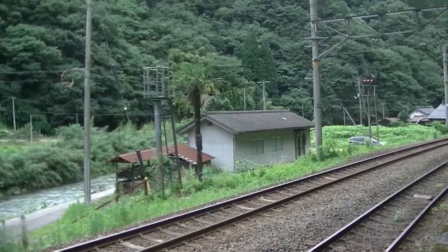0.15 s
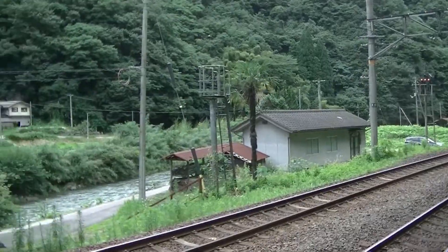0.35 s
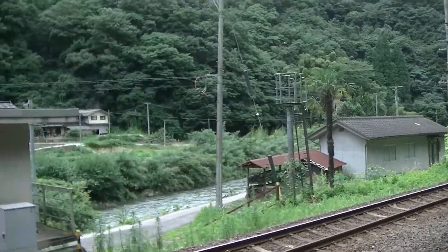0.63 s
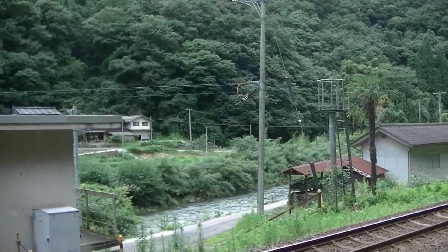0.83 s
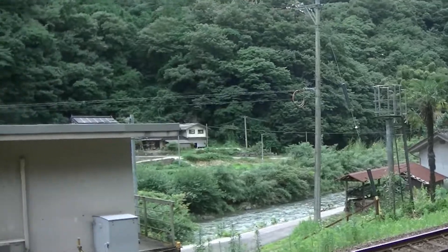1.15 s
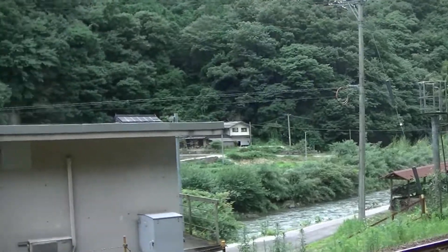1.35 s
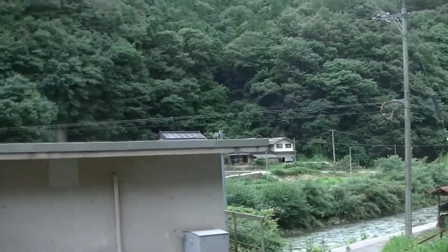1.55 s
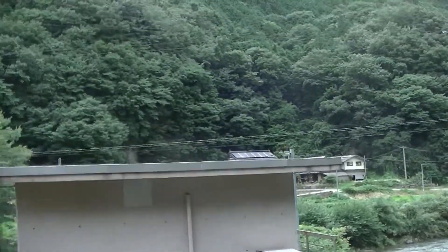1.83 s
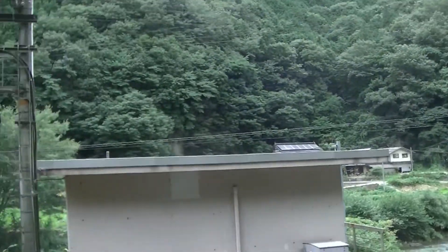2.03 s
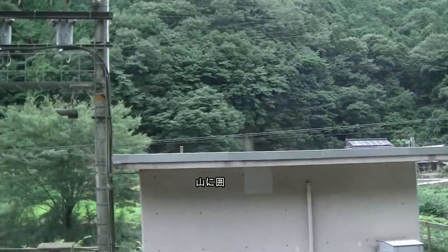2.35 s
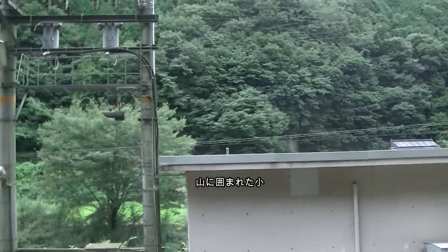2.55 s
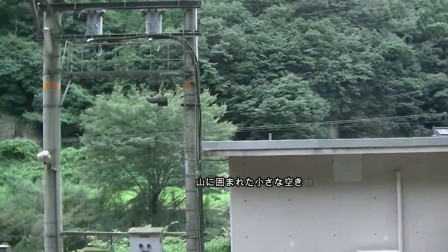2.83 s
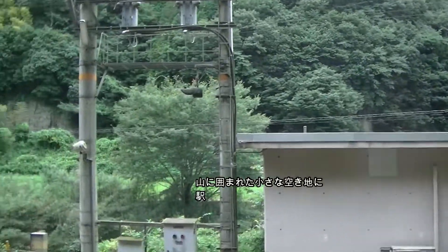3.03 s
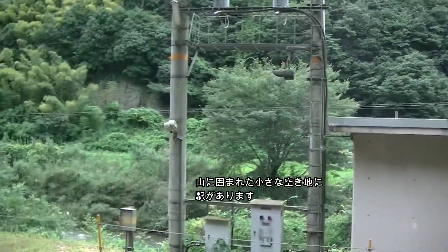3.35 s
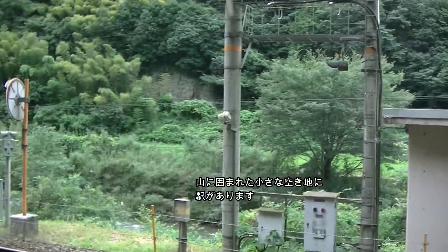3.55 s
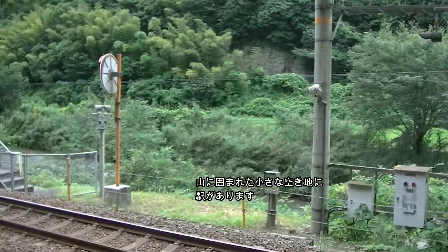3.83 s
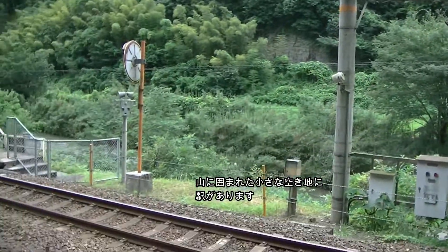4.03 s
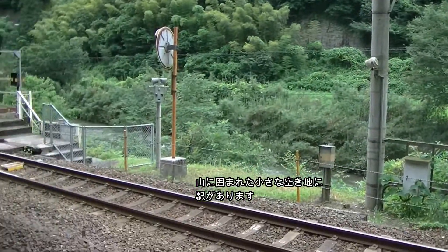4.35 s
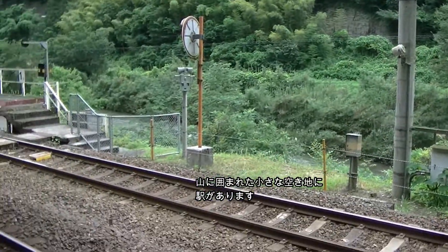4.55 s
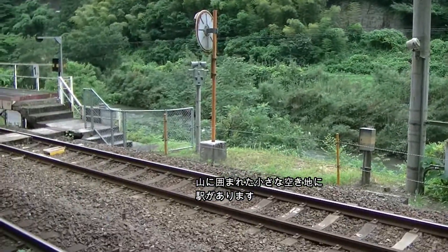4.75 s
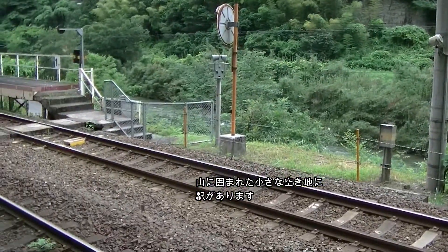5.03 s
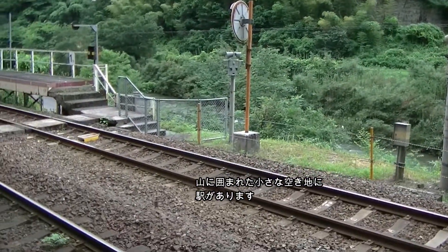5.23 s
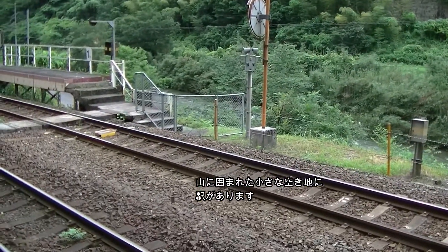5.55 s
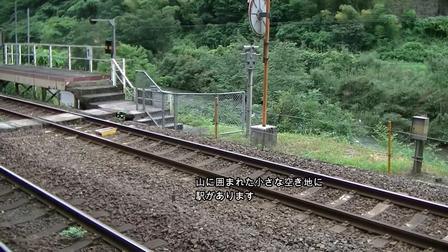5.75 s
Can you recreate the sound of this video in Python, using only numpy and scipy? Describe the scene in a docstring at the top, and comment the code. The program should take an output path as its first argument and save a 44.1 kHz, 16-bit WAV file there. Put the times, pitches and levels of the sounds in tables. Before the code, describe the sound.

From 0 to about 6 seconds, shallow river rapids rush continuously, a broad mid-heavy wash with gently fluctuating bands, little deep rumble and its body to the left; it fades by only about one decibel. A distant cicada crowd shimmers between roughly 2 and 7 kHz, rising over the first 3.4 seconds. Two small cicadas sizzle unbroken around 8 kHz, growing louder and more direct from 1.5 to 5.4 seconds. A near, bright cicada swells in raspy phrases about every 0.8 seconds, starting almost at once. A narrow buzz answers between them, strongest near 0.4 and 4.5 seconds, alongside a duller far singer whose last phrase is faint. From about 1.9 seconds a thin, nearly tonal whine comes and goes, its pitch creeping up around 3.4 seconds and strongest after 5.1. The stereo microphones turn slowly, shifting cicadas slightly left during the first 2.5 seconds; trees scatter everything diffusely.

```python
"""The rush of river rapids and a hillside of cicadas sound together throughout, at a slowly turning microphone pair.
The rapids are noise in four bands that surge independently, standing for countless bubbles.
Each cicada is a train of tymbal clicks and rasps ringing a resonant abdomen: two sizzle without pause,
four sing in overlapping phrases, and a distant crowd merges into a shimmer. The trees scatter all of them."""
import sys
import numpy as np
from scipy import signal
from scipy.fft import rfft, irfft
from scipy.io import wavfile
from scipy.ndimage import uniform_filter1d, map_coordinates

SR = 44100
rng = np.random.default_rng(int(sys.argv[2]) if len(sys.argv) > 2 else 0)


def digitize_waveform(pressure):
    """Quantize a signal to 16-bit integers and store it at the path in sys.argv[1].

    Rows of a 2-D input are taken as channels; values are limited to [-1, 1].
    """
    field = np.atleast_2d(pressure).T
    bounded = np.clip(field, -1, 1)
    quanta = np.round(bounded * 32767).astype(np.int16)
    wavfile.write(sys.argv[1], SR, quanta)


N = 259749
TIME = np.arange(N) / SR
FREQ = np.fft.rfftfreq(N, 1 / SR) + 1e-6  # the offset avoids dividing by zero


def undb(db):
    """Level to amplitude: 20 dB is a factor of ten."""
    return 10 ** (np.asarray(db) / 20)


def unit(x):
    """Normalisation by mean power: scale to rms 1."""
    return x / np.sqrt(np.mean(x ** 2))


def ease(start, length):
    """Raised-sine transition: a smooth move from 0 to 1, with times in seconds."""
    return np.sin(np.pi / 2 * np.clip((TIME - start) / length, 0, 1)) ** 2


def walk(rate):
    """Low-pass random fluctuation: levels held 1 / rate s, then averaged twice; spread near 1."""
    hold = max(int(SR / rate), 1)
    held = rng.standard_normal(4096)[np.arange(N) // hold % 4096]
    smoothed = uniform_filter1d(uniform_filter1d(held, hold), hold)
    return 1.3 * smoothed


def colour(x, points):
    """Spectral shaping: gain follows (frequency [Hz], level [dB]) points along log frequency."""
    hz, db = np.transpose(points)
    gain = undb(np.interp(np.log(FREQ), np.log(hz), db))
    return irfft(rfft(x) * gain, N)


def resonate(x, modes):
    """Modal resonance: powers of steep-sided (centre [Hz], width [Hz], level [dB]) modes add."""
    power = 0
    for hz, width, db in modes:
        detuning = (FREQ / hz - hz / FREQ) * hz / width
        power = power + undb(db) ** 2 / (1 + detuning ** 2) ** 2
    return unit(irfft(rfft(x) * np.sqrt(power), N))


COHERENCE_HZ = 5740  # likeness of the two microphones halves here and falls off above


def surround(pair, ceiling):
    """Diffuse-field coherence: two unrelated sounds become alike in the bass, unlike in the treble."""
    likeness = np.clip(ceiling, 0, 1) / (1 + (FREQ / COHERENCE_HZ) ** 4.0)
    mid, side = irfft(rfft(pair) * np.sqrt([1 + likeness, 1 - likeness]), N)
    return np.array([mid + side, mid - side])


def woods(x, t60, count=36):
    """Multiple scattering: trunks and leaves return a dense, decaying echo cloud that keeps changing."""
    hop = N // count + 1
    age = TIME[:SR // 3]
    fade = np.sin(np.pi * np.arange(2 * hop) / (2 * hop))
    decay = np.exp(-np.log(1000) * age / t60)  # falls at 60 dB per t60 seconds
    padded = np.pad(x, (hop, 2 * hop))
    pair = np.zeros((2, N + 3 * hop + len(age)))
    # overlapping stretches of song, each with freshly drawn echoes
    for start in range(0, N + hop, hop):
        echoes = rng.standard_normal((2, len(age))) * decay / np.linalg.norm(decay)
        stretch = fade * padded[start:start + 2 * hop]
        cloud = signal.fftconvolve(stretch[None], echoes, axes=1)
        pair[:, start:start + cloud.shape[1]] += cloud
    return surround(pair[:, hop:hop + N], ceiling=0.99)


# as the pair turns, the cicadas shift left: left lead [samples] and left minus right [dB], added to each
SHIFT_S, LEAD_BEFORE, LEAD_AFTER, PAN_BEFORE_DB, PAN_AFTER_DB = 2.5, -0.15, 0.78, -.3, .55


def place(x, direct, lead, pan_db, t60):
    """Direct and scattered power: one share arrives straight with a time difference, the rest via trees."""
    share = np.clip(direct, 0, 1)
    sides = np.array([[1], [-1]]) / 2  # left, right
    shift = ease(0, SHIFT_S)
    lead = lead + LEAD_BEFORE + (LEAD_AFTER - LEAD_BEFORE) * shift
    pan_db = pan_db + PAN_BEFORE_DB + (PAN_AFTER_DB - PAN_BEFORE_DB) * shift
    read_at = np.arange(N) + sides * lead
    straight = np.array([map_coordinates(x, [at], order=3, mode="nearest") for at in read_at])
    scattered = woods(x, t60)
    return (np.sqrt(share) * straight + np.sqrt(1 - share) * scattered) * undb(sides * pan_db)


def tymbal(hz, waver, jitter, rasp, click_db=0.5):
    """Buckling ribs: once a cycle an uneven click, then a decaying rasp; jitter is in cycles."""
    cycles = np.cumsum(hz * (1 + waver * walk(9))) / SR
    chance = rng.standard_normal((4000, 2))[:int(cycles[-1])]
    click_cycles = np.arange(len(chance)) + jitter * chance[:, 0]
    at = np.interp(click_cycles, cycles, np.arange(N))
    # short sinc pulses put the clicks between samples
    taps = at.astype(int)[:, None] + np.arange(-5, 7)
    shapes = np.sinc(taps - at[:, None]) * undb(click_db * chance[:, 1:])
    clicks = np.bincount(np.clip(taps, 0, N - 1).ravel(), shapes.ravel(), N)
    snaps = rng.standard_normal(N) * np.exp(-(cycles % 1) / 0.37)
    return unit(clicks) + rasp * unit(snaps)


def phrases(rows, attack_s, swell_db, release_s, rest_db):
    """Amplitude envelope: quick rise, swell from 2 * swell_db to swell_db below reference, decay, idling."""
    power = undb(rest_db) ** 2
    for start, length, db in rows:
        age = TIME - start
        swell = undb(db - swell_db * (2 - np.clip(age / length, 0, 1)))
        release = np.exp(-np.maximum(age - length, 0) / release_s)
        power = power + (ease(start, attack_s) * swell * release) ** 2
    return np.sqrt(power)


# spectrum of the rushing rapids: (frequency [Hz], relative level [dB])
RAPIDS_SPECTRUM = [(25, -19.5), (110, -20.5), (200, -15.5), (300, -9.5), (450, -4), (650, 0), (1250, 0),
                   (1650, -2), (2900, -6.5), (6000, -5), (10500, -19), (16000, -23)]
# the rapids' level at first, and their steady fade as the pair turns away
RIVER_DB, RIVER_FADE_DB_PER_S = -43, 0.19


def river(count=4):
    """Incoherent bubble noise: many sources merge into a rush whose frequency bands surge independently."""
    rush = 0
    for hz in np.geomspace(150, 9600, count):
        octaves = np.log2(np.clip(FREQ, 150, 9600) / hz)
        band = np.cos(np.pi / 2 * np.clip(octaves / 2, -1, 1))
        noise = irfft(rfft(rng.standard_normal((2, N))) * band, N)
        rush = rush + noise * undb(.55 * walk(9))
    # the faint rumble below the rush differs between the microphones
    likeness = 0.92 * (1 - 0.94 / (1 + (FREQ / 235) ** 2))
    water = unit(surround(colour(rush, RAPIDS_SPECTRUM), likeness))
    # the body of the rush lies to the left
    left_db = 3.3 * likeness / (1 + (FREQ / 1200) ** 2)
    panned = irfft(rfft(water) * undb(np.array([left_db, -left_db]) / 2), N)
    return panned * undb(RIVER_DB - RIVER_FADE_DB_PER_S * TIME)


# combined resonances of the distant cicadas: (centre [Hz], width [Hz], relative level [dB])
CROWD_RESONANCES = [(2330, 750, -5), (3370, 810, -5.5), (3857, 480, -2), (4686, 580, -4), (5200, 810, -3.3),
                    (5910, 1470, -3.5), (6900, 1100, -8.5)]
# level at first, its gain as the pair turns towards the hillside, and how long that takes
CROWD_DB, CROWD_GAIN_DB, CROWD_RISE_S = -44.5, 3, 3.4


def crowd(count=5):
    """Superposition: distant cicadas, each with its own click rate and swells, merge into a shimmer."""
    voices = 0
    for hz in np.linspace(205, 275, count):
        voice = tymbal(hz=hz, waver=.014, jitter=.02, rasp=1.17)
        voices = voices + voice * undb(1.56 * walk(4.04))
    facing = ease(0, CROWD_RISE_S)
    song = resonate(voices, CROWD_RESONANCES) * undb(CROWD_DB + CROWD_GAIN_DB * facing)
    return place(song, direct=0.34 + 0.18 * facing, lead=-0.71, pan_db=0.3, t60=1.03)


# abdomen resonances of the small cicadas: (centre [Hz], width [Hz], relative level [dB])
SIZZLE_RESONANCES = [(7580, 1330, -2), (8240, 890, 0.5), (8740, 960, -4.5), (9500, 800, -19.5),
                     (12940, 5000, -16.5)]
# the turn towards their trees; level before it, and gain once facing them
TURN_START_S, TURN_LENGTH_S = 1.53, 3.84
SIZZLE_DB, SIZZLE_GAIN_DB = -39.5, 4.5


def sizzlers():
    """Neighbouring click rates: two small cicadas hold a fast, high sizzle without pause."""
    voices = sum(tymbal(hz=hz, waver=.006, jitter=0.025, rasp=2.1) for hz in (446.5, 452))
    # louder and more direct as the pair turns towards them
    facing = ease(TURN_START_S, TURN_LENGTH_S)
    song = resonate(voices, SIZZLE_RESONANCES) * undb(SIZZLE_DB + SIZZLE_GAIN_DB * facing)
    return place(song, direct=0.34 + 0.25 * facing, lead=.15, pan_db=0.7, t60=0.67)


# phrases of the near cicada, swelling from 2 * swell_db to swell_db below the reference:
# (start [s], length [s], reference level [dB])
NEAR_PHRASES = [(0.07, 0.29, -46), (0.88, 0.31, -44), (1.69, .35, -42.5), (2.47, 0.43, -43.5),
                (3.3, .39, -42.5), (4.11, 0.47, -42), (4.89, 0.59, -43), (5.62, 0.39, -43)]
# its abdomen resonances: (centre [Hz], width [Hz], relative level [dB])
NEAR_RESONANCES = [(3620, 740, -1.5), (4960, 630, 0), (6100, 1100, -3), (7500, 1000, -8.5),
                   (11300, 1400, -5), (12370, 500, 3), (13700, 1600, -3), (15200, 1800, -11)]


def near_singer():
    """Effort-driven rate: a bright cicada pumps its abdomen and clicks faster as each phrase swells."""
    loudness = phrases(NEAR_PHRASES, attack_s=.11, swell_db=2.0, release_s=.12, rest_db=-58)
    effort = loudness / loudness.max()
    rate_hz = 226 * (1 + .025 * effort)
    clicks = tymbal(hz=rate_hz, waver=.008, jitter=0.014, rasp=2.1, click_db=3.0)
    song = resonate(clicks, NEAR_RESONANCES)
    return place(song * loudness, direct=0.3, lead=-1.0, pan_db=-1.5, t60=0.14)


# phrases of the buzzing cicada, swelling from 2 * swell_db to swell_db below the reference:
# (start [s], length [s], reference level [dB])
BUZZ_PHRASES = [(0.38, 0.51, -47.5), (1.25, 0.41, -50.5), (2.05, 0.34, -52), (2.85, .38, -50),
                (3.7, .48, -49), (4.54, 0.39, -45), (5.33, 0.34, -50.5)]
# its abdomen resonances: (centre [Hz], width [Hz], relative level [dB])
BUZZ_RESONANCES = [(3362, 244, 2.5), (4810, 210, -2)]


def buzzer():
    """Narrow resonance: regular clicks ring two slim modes into a steady buzz."""
    song = resonate(tymbal(hz=228.7, waver=.005, jitter=0.011, rasp=0.84), BUZZ_RESONANCES)
    loudness = phrases(BUZZ_PHRASES, attack_s=0.054, swell_db=1.0, release_s=0.055, rest_db=-55.5)
    return place(song * loudness, direct=0.69, lead=-1.3, pan_db=-.1, t60=0.11)


# phrases of the far cicada, swelling from 2 * swell_db to swell_db below the reference:
# (start [s], length [s], reference level [dB])
FAR_PHRASES = [(0.55, .35, -45), (1.18, 0.49, -44.5), (2.06, 0.43, -42.5), (2.92, 0.34, -45),
               (3.8, 0.37, -44.5), (4.55, 0.35, -46.5), (5.25, 0.44, -56)]
# its lowest abdomen resonances: (centre [Hz], width [Hz], relative level [dB])
FAR_RESONANCES = [(2028, 420, 1), (2386, 430, -0.5), (3500, 510, -3.5)]


def far_singer():
    """Treble loss with distance: a cicada in the gaps is dulled to its lowest resonances."""
    song = resonate(tymbal(hz=228.6, waver=.012, jitter=0.025, rasp=1.26), FAR_RESONANCES)
    loudness = phrases(FAR_PHRASES, attack_s=0.081, swell_db=3.4, release_s=0.04, rest_db=-50.5)
    return place(song * loudness, direct=0.67, lead=-2.2, pan_db=0, t60=0.24)


# phrases of the whining cicada, swelling from 2 * swell_db to swell_db below the reference:
# (start [s], length [s], reference level [dB])
WHINE_PHRASES = [(1.5, .2, -59), (1.9, .66, -48), (2.88, 0.41, -47), (3.44, .5, -47), (4.53, 0.31, -47.5),
                 (5.12, 0.66, -43.5)]
# its abdomen resonances: (centre [Hz], width [Hz], relative level [dB])
WHINE_RESONANCES = [(3680, 140, -3), (4650, 360, -22)]
# its click rate climbs from low to high, fastest at the middle; CLIMB_S is the time constant
WHINE_LOW_HZ, WHINE_HIGH_HZ, CLIMB_MIDDLE_S, CLIMB_S = 238.5, 249.7, 3.4, .5


def whiner():
    """Selective resonance: nearly one partial sounds, creeping up across the abdomen's main mode."""
    climb = (1 + np.tanh((TIME - CLIMB_MIDDLE_S) / CLIMB_S)) / 2
    rate_hz = WHINE_LOW_HZ + (WHINE_HIGH_HZ - WHINE_LOW_HZ) * climb
    song = resonate(tymbal(hz=rate_hz, waver=.006, jitter=0.014, rasp=1.0), WHINE_RESONANCES)
    loudness = phrases(WHINE_PHRASES, attack_s=0.043, swell_db=1.5, release_s=0.086, rest_db=-53.5)
    return place(song * loudness, direct=0.92, lead=-1, pan_db=-0.5, t60=0.1)


def scene():
    """Linear superposition: river and cicadas add."""
    return river() + crowd() + sizzlers() + near_singer() + buzzer() + far_singer() + whiner()


TOP_HZ = 15720  # upper edge of the pass band


def record(dry):
    """Band limiting: a steep elliptic low-pass cuts the top."""
    low_pass = signal.ellip(12, .1, 80, TOP_HZ, fs=SR, output="sos")  # order, ripple [dB], stop band [dB]
    return signal.sosfilt(low_pass, dry)


dry = scene()
out = record(dry)
digitize_waveform(out)
```